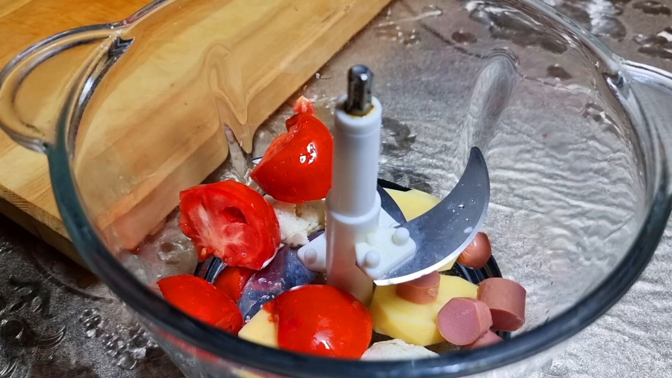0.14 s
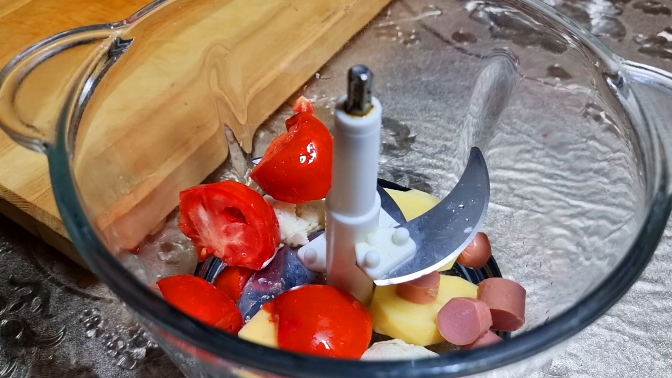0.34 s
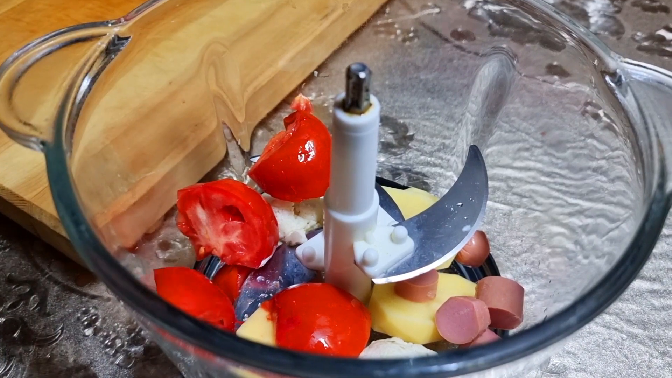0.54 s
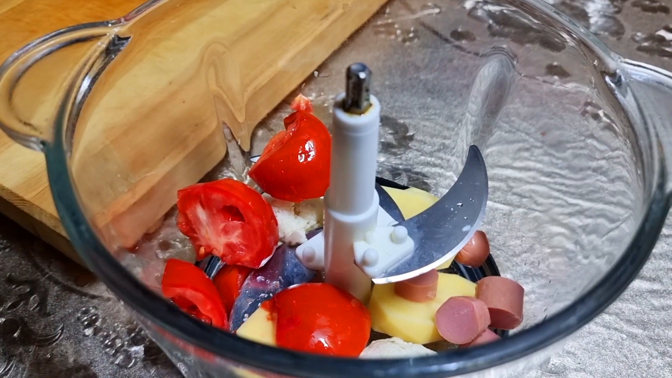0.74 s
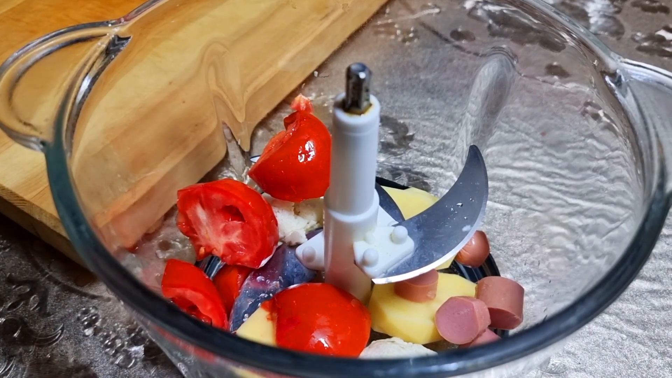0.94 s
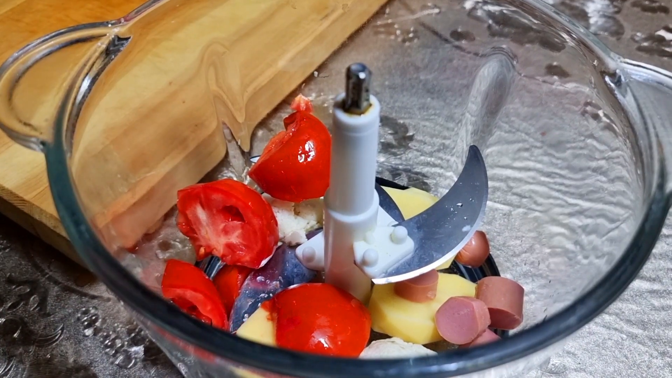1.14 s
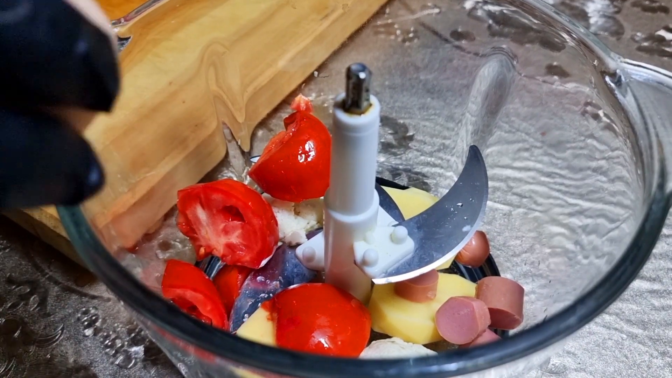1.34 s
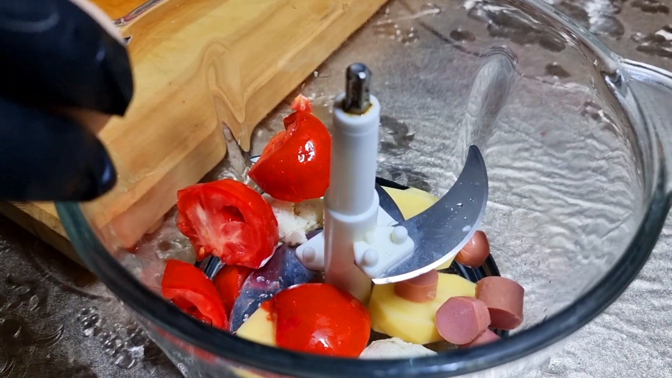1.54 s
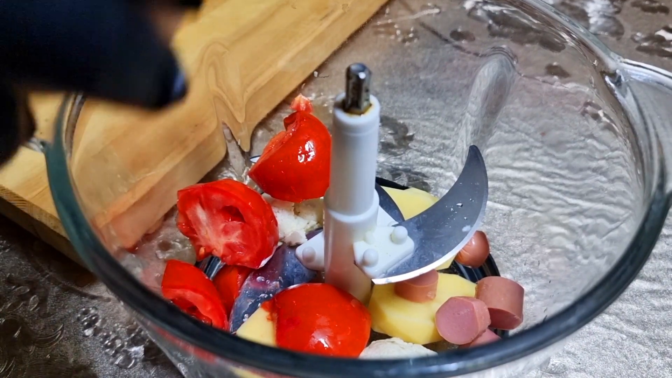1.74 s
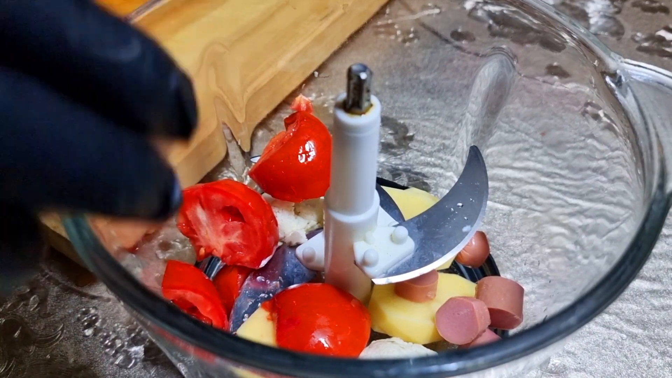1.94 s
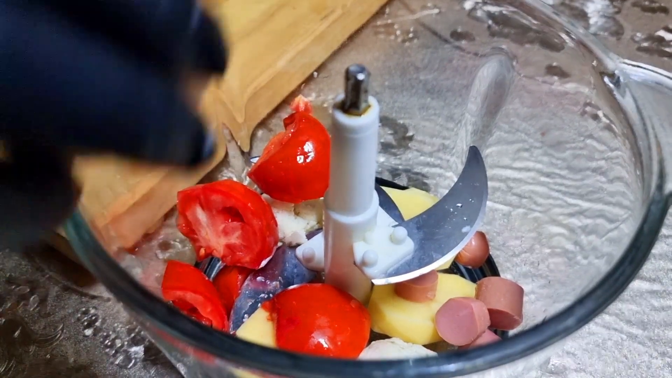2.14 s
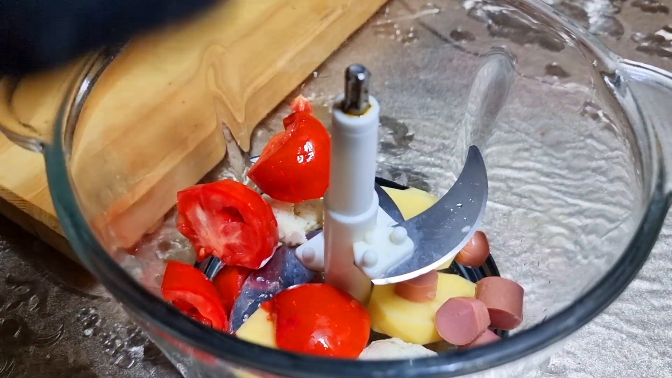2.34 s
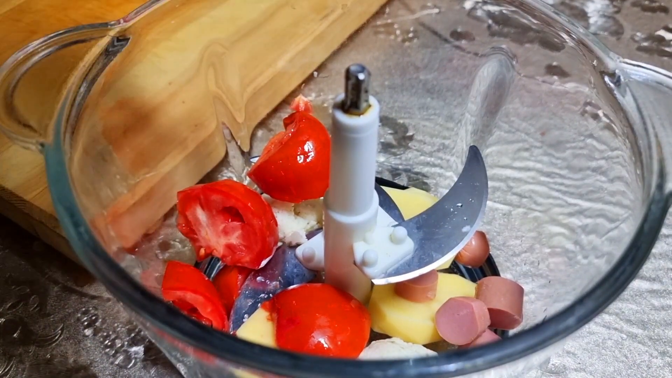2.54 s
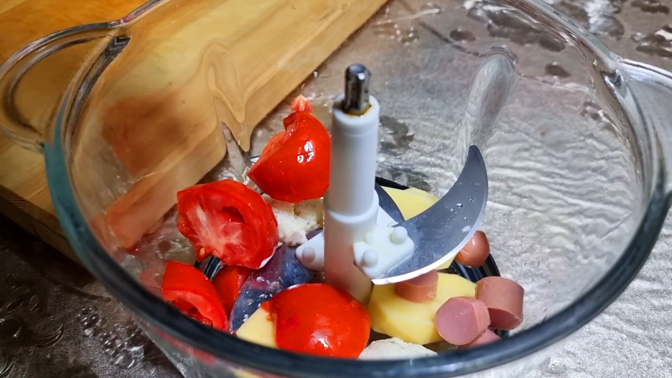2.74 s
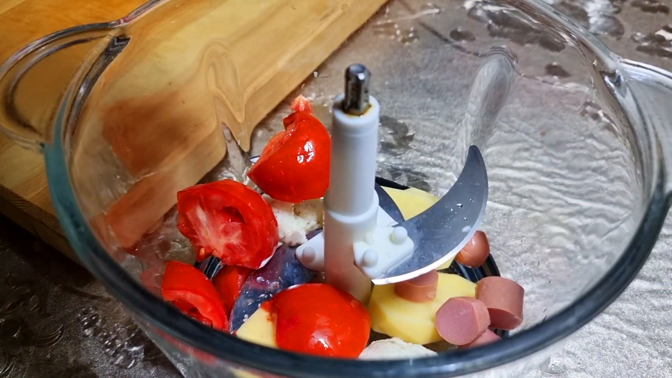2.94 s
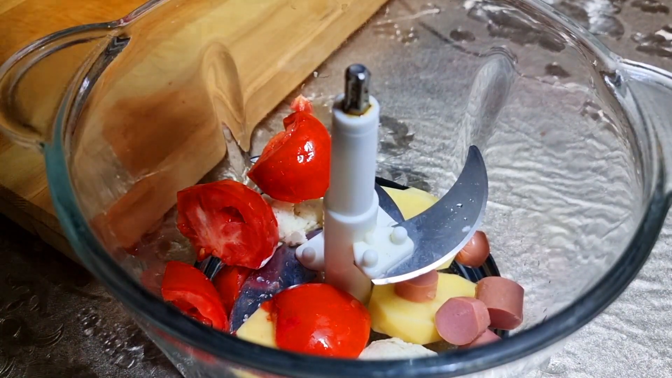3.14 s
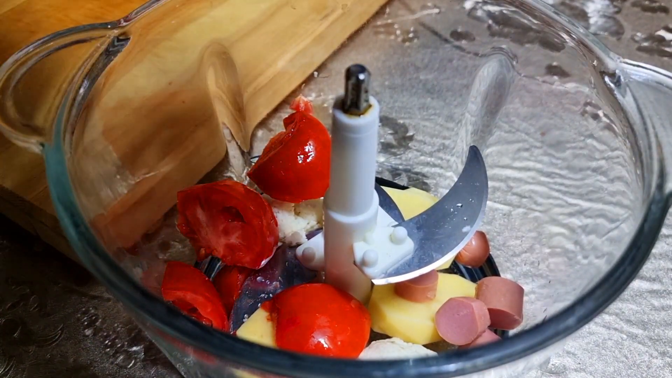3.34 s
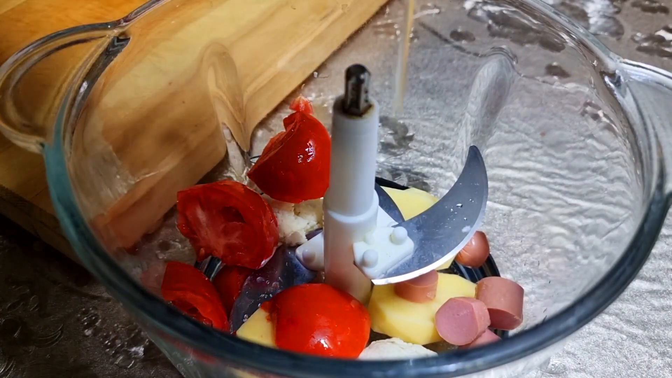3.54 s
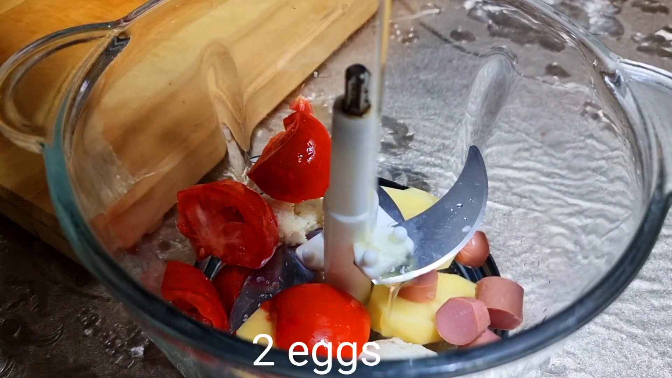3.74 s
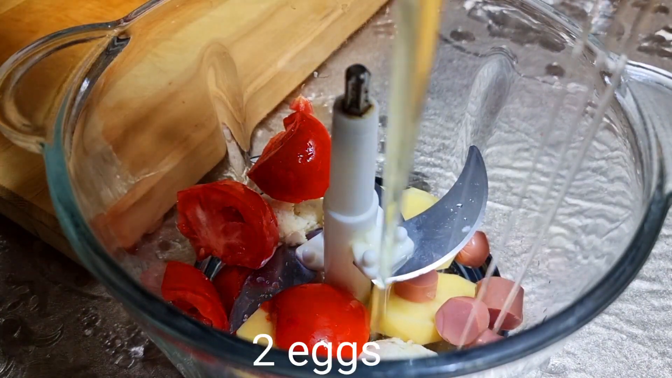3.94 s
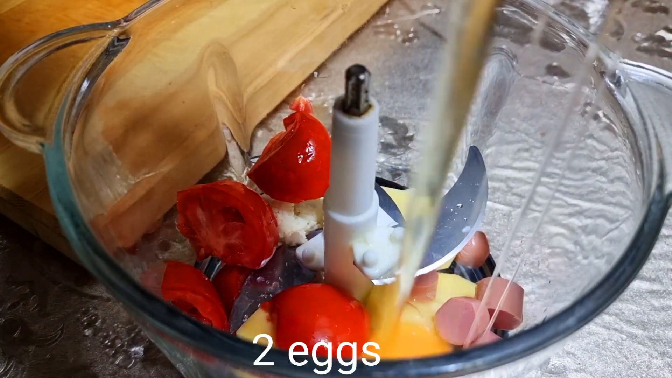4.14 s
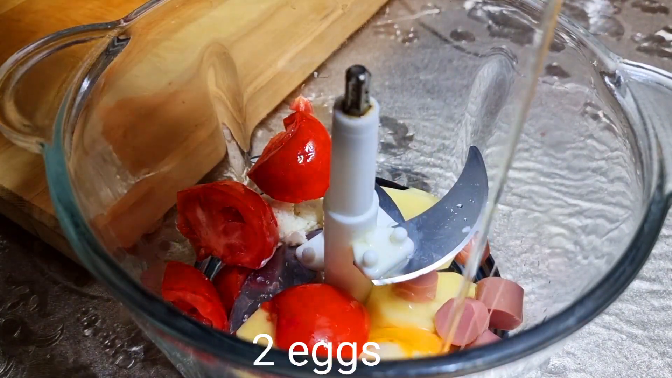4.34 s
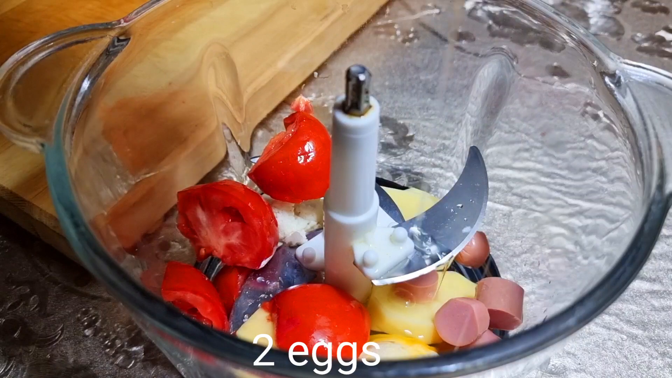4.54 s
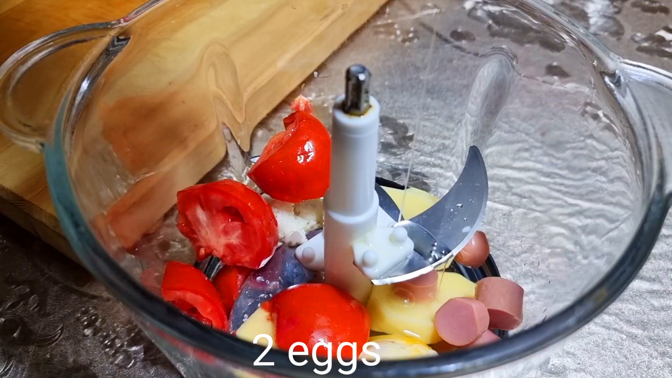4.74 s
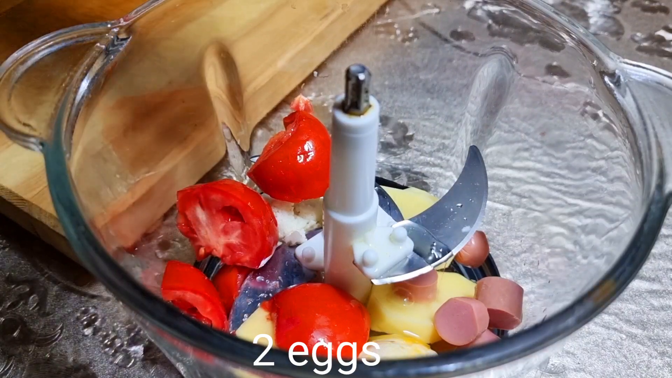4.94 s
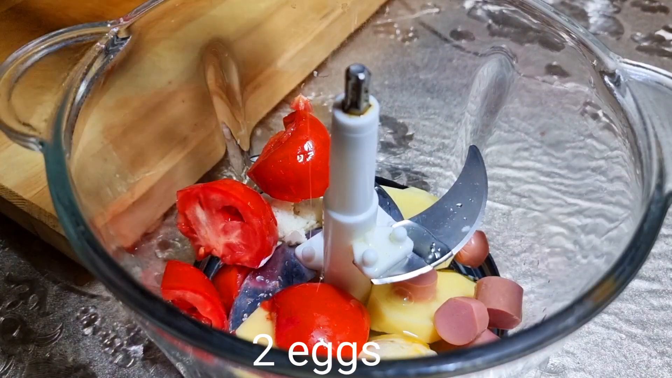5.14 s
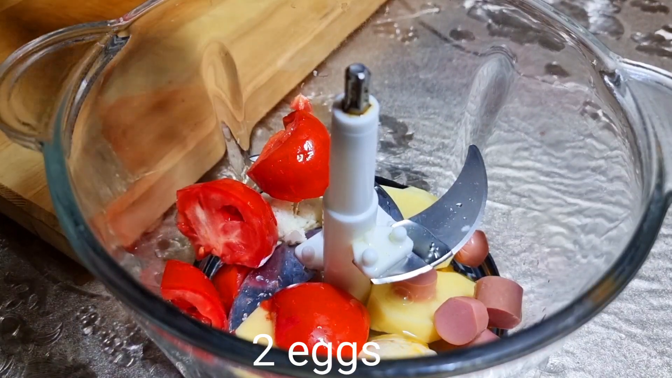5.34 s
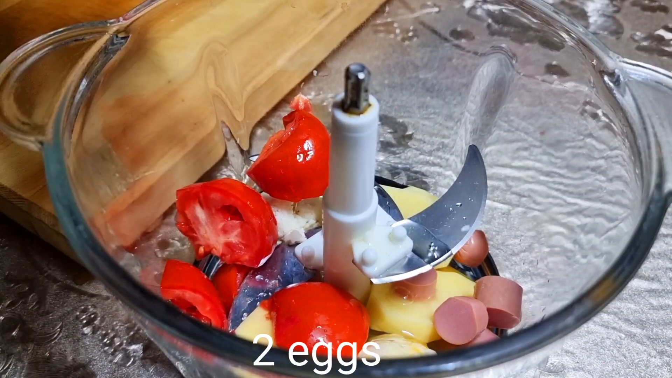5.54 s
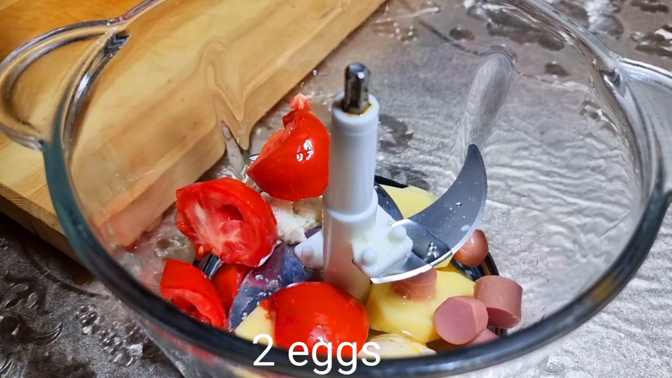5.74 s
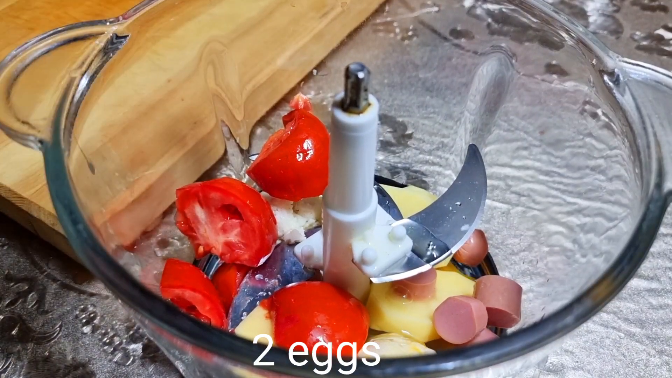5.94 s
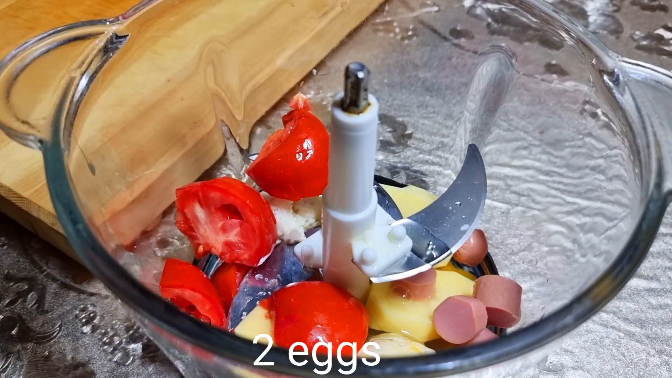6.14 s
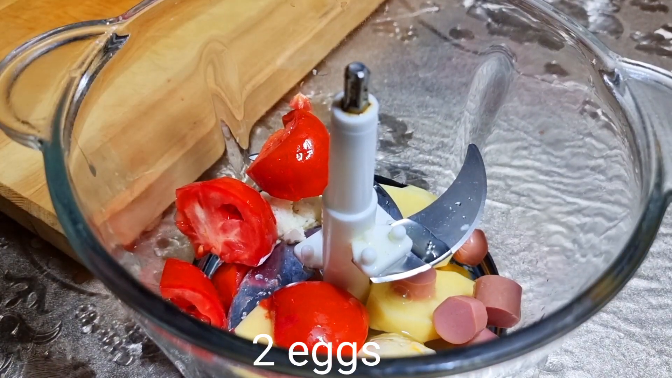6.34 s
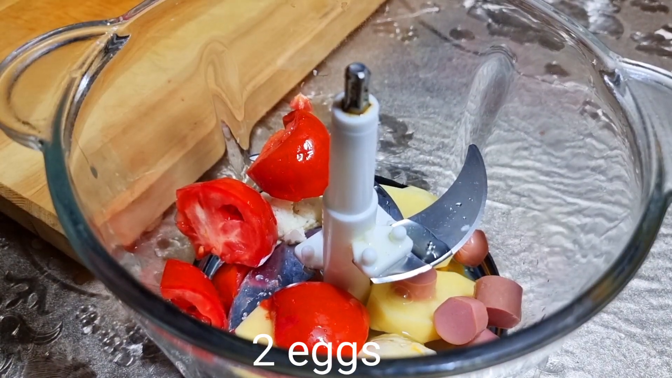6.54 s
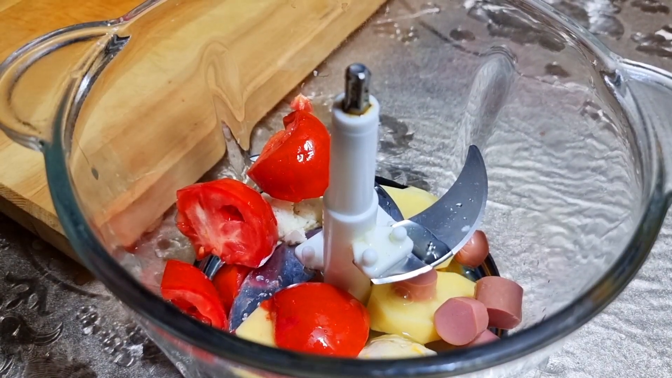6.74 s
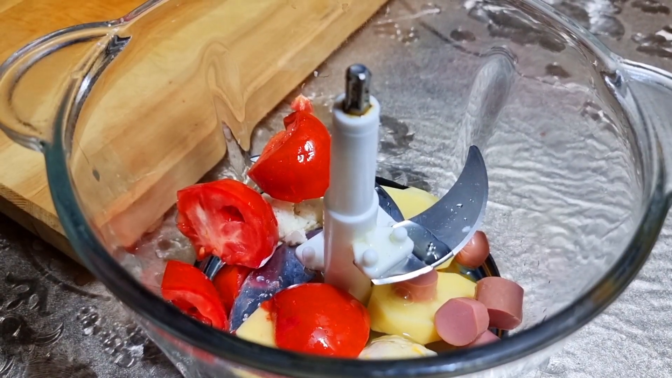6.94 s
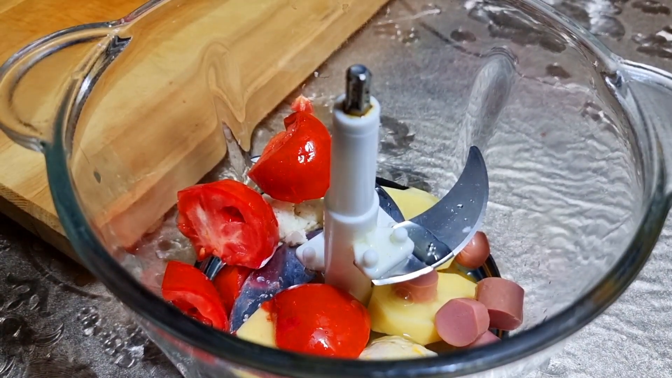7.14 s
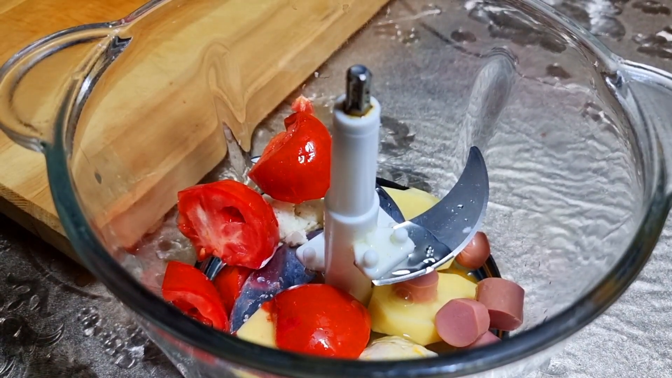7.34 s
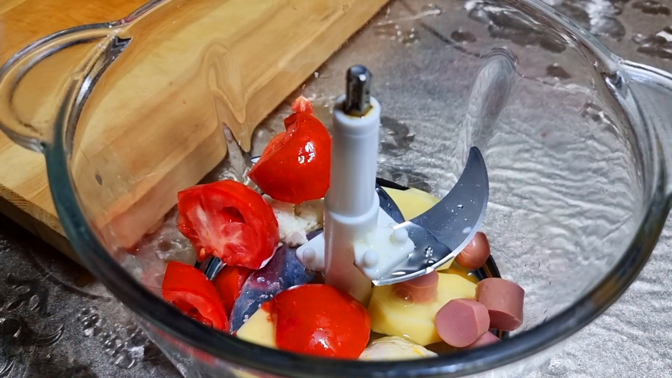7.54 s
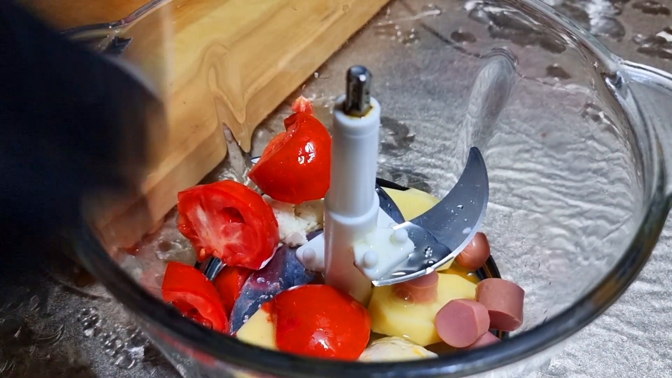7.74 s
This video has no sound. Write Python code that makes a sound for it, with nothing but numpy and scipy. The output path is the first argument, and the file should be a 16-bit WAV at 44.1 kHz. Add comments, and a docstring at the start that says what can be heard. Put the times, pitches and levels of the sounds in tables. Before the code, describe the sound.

Close stereo in a quiet kitchen with faint hiss and low room tone. After two near-silent seconds, an egg raps twice on a glass bowl, which rings brightly and thuds on the counter. The shell snaps in small dry cracks with a wet pop, the egg flops softly onto chopped vegetables, the empty shell crackles, soft thumps follow, and a dull knock sounds to the left.

```python
"""Quiet kitchen, close stereo: an egg is knocked twice on the rim of a glass chopper bowl.
The bowl rings as decaying wall modes and thuds on the counter as low modes and rumble.
The shell snaps (spiked noise); dry glove rubs and wet squelches are dense clicks, some ringing hollow.
The egg flops onto chopped vegetables with low thumps and pops, and the empty shell crackles.
A dull modal knock sounds to the left; noise hiss, with one faint rustle, and a low room tone run on."""
import sys
import numpy as np
from scipy import signal
from scipy.fft import rfft, irfft, next_fast_len
from scipy.io import wavfile
from scipy.ndimage import uniform_filter1d

SR = 44100
rng = np.random.default_rng(int(sys.argv[2]) if len(sys.argv) > 2 else 0)


def store_pcm(level_fs):
    """Save levels as 16-bit WAV."""
    pcm = np.round(np.clip(level_fs, -1, 1) * 32767).astype(np.int16)
    wavfile.write(sys.argv[1], SR, np.atleast_2d(pcm).T)


N = 347508


def from_db(db):
    """Decibels to amplitude gain."""
    return 10 ** (np.asarray(db) / 20)


def rms_one(x):
    """Scale to unit power."""
    return x / np.sqrt(np.mean(x ** 2) + 1e-20)


def seconds(length_s):
    """Time axis in seconds."""
    return np.arange(int(length_s * SR)) / SR


def decay(t, t60):
    """Exponential fall of 60 dB in t60, in the unit of t."""
    return np.exp(-np.log(1000) * t / t60)


def bell(t, centre_s, half_s):
    """Gaussian swell of height 1, down to 1/e at half_s from its centre."""
    return np.exp(-np.minimum(((t - centre_s) / half_s) ** 2, 50))


def panned(left_over_right_db):
    """Left and right gains for a level difference, at constant power."""
    return rms_one(from_db(np.array([[left_over_right_db], [-left_over_right_db]]) / 2))


def add(out, start_s, sound):
    """Mix a sound in at start_s."""
    i = int(round(start_s * SR))
    out[:, i:i + sound.shape[-1]] += sound[..., :N - i]


def at_hz(points, hz):
    """Interpolate a table along log frequency."""
    point_hz, value = np.transpose(points)
    return np.interp(np.log(np.maximum(hz, 1)), np.log(point_hz), value)


def band(x, edges_hz, kind, order=2):
    """Butterworth filter."""
    edges_hz = np.clip(edges_hz, 10, .47 * SR)
    return signal.sosfilt(signal.butter(order, edges_hz, kind, fs=SR, output="sos"), x)


def coloured(x, spectrum):
    """Minimum-phase filter with the given spectrum: nothing sounds early."""
    n = 2 * next_fast_len(x.shape[-1] // 2 + 1024)
    gain = from_db(at_hz(spectrum, np.arange(n // 2 + 1) * SR / n))
    cepstrum = irfft(np.log(gain))
    # fold onto positive time
    cepstrum[1:n // 2] *= 2
    cepstrum[n // 2 + 1:] = 0
    return irfft(rfft(x, n) * np.exp(rfft(cepstrum)))[..., :x.shape[-1]]


# left-right likeness of nearby sounds: pitch_hz, correlation [-1..1]
LIKENESS = [(100, 1), (400, 0.37), (900, 0.33), (1600, -0.73), (3500, -0.56), (8000, -0.53), (15000, 0.66)]


def stereo_noise(size):
    """White noise whose left-right correlation varies with frequency."""
    mid, side = rfft(rng.standard_normal((2, size)))
    alike = np.clip(at_hz(LIKENESS, np.arange(len(mid)) * SR / size), -1, 1)
    return irfft(np.sqrt(1 + alike) * mid + np.sqrt(1 - alike) * side * [[1], [-1]], size)


def burst(spectrum, t60_s, hold_s=0.0):
    """Contact: coloured noise that starts at unit power, holds and dies."""
    t = seconds(.6)
    noise = rms_one(coloured(stereo_noise(len(t)), spectrum))
    return noise * decay(np.maximum(t - hold_s, 0), t60_s)


# hiss colour, mid channel: pitch_hz, gain_db
HISS_MID = [(320, -36.5), (550, -6.5), (983, 0), (1110, -7.5), (1430, -3.5), (2450, -7.5), (2850, -3.5),
            (3610, -4), (4960, -2.5), (5460, -7.5), (6100, -7), (10200, -13), (11900, -36), (12900, -31),
            (15000, -33.5)]
# hiss colour, side channel: pitch_hz, gain_db
HISS_SIDE = [(180, -46.5), (300, -14.5), (597, -9.5), (637, -5.5), (1190, -5.5), (1520, -1.5), (2440, -10),
             (2780, -0.5), (3170, -7.5), (4770, -5), (5440, -11.5), (9030, -16.5), (10800, -24),
             (11900, -41.5), (15000, -34.5)]
# low tone of the room: pitch_hz, gain_db
ROOM_TONE = [(15, -44.5), (25, -14.5), (43, -11.5), (114, 2.5), (189, -16), (233, -8), (277, -2.5),
             (377, -5), (413, -7.5), (600, -13.5), (780, -37), (1320, -120)]


def hiss(level_db=-69, mid_db=0.0, side_db=3.0, room_db=-15, top_hz=10600, top_leak_db=-15,
         rustle_s=.92, rustle_half_s=0.31, rustle_db=2.0):
    """Wide noise, steeply cut at the top, over a low tone; a faint rustle of handling swells once in it."""
    mid = rms_one(coloured(rng.standard_normal(N), HISS_MID))
    side = rms_one(coloured(rng.standard_normal(N), HISS_SIDE))
    room = rms_one(coloured(rng.standard_normal(N), ROOM_TONE))
    noise = from_db(mid_db) * mid + from_db(side_db) * side * [[1], [-1]] + from_db(room_db) * room
    top_leak = from_db(top_leak_db) * band(noise, top_hz, "high", order=6)
    noise = band(noise, top_hz, "low", order=14) + top_leak
    # the rustle is made as a gain bump on the noise
    return noise * from_db(level_db + rustle_db * bell(np.arange(N) / SR, rustle_s, rustle_half_s))


# soft landings and nudges: start_s, level_db, pitch_hz
THUMPS = [(0.523, -62, 73), (0.609, -69, 63.6), (0.803, -60, 129), (1.127, -65.5, 84), (1.565, -68.5, 142),
          (1.954, -68, 129), (4.317, -45.5, 106), (4.33, -56, 220), (4.42, -69, 79.5), (4.877, -59, 350),
          (5.399, -58.5, 510), (5.474, -56, 280), (5.511, -59.5, 112), (5.68, -58.5, 91), (6.362, -51, 120),
          (6.434, -59, 126.5), (6.537, -42.5, 155.5)]


def thumps(rumble_db=-7, rise_cycles=1.2, decay_cycles=20, half_width_octaves=0.47):
    """Soft weights push slowly, so only a low tone and rumble answer; low ones swell and die slower."""
    out, t = np.zeros((2, N)), seconds(.4)
    width = 2 ** half_width_octaves
    for start_s, level_db, hz in THUMPS:
        cycles = hz * t
        rumble = rms_one(band(stereo_noise(len(t)), [hz / width, hz * width], "band"))
        rise = np.minimum(cycles / rise_cycles, 1)
        push = rise * decay(np.maximum(cycles - rise_cycles, 0), decay_cycles)
        answer = (np.sin(2 * np.pi * cycles) + from_db(rumble_db) * rumble) / np.sqrt(2)
        add(out, start_s, from_db(level_db) * push * answer)
    return out


# air pockets popping in wet food and shell: start_s, level_db, pitch_hz
POPS = [(0.614, -46, 4360), (3.7265, -28, 3610), (3.7485, -23.5, 3340), (3.7565, -31, 3450),
        (3.7671, -18, 3280), (3.813, -44, 2400), (4.328, -48.5, 1574), (4.341, -55.5, 818),
        (5.653, -36, 2920), (5.728, -43, 2708), (6.017, -42.5, 2370)]


def pops(glide=0.019, rise_s=0.00069, pan_db=5, left_lead_rad=0.83,
         pop_t60_cycles=33, after_t60_cycles=130, after_db=-13):
    """Air pockets open and ring for a set number of cycles, rising a little in pitch."""
    out, t = np.zeros((2, N)), seconds(.1)
    for start_s, level_db, hz in POPS:
        cycles = hz * t
        after_ring = decay(cycles, after_t60_cycles)
        pitch_hz = hz * (1 + glide * (1 - after_ring))
        phase = 2 * np.pi * np.cumsum(pitch_hz) / SR + np.array([[left_lead_rad], [0]])
        ring = decay(cycles, pop_t60_cycles) + from_db(after_db) * after_ring
        pop = np.sin(phase) * ring * (1 - np.exp(-t / rise_s))
        add(out, start_s, from_db(level_db) * pop * panned(pan_db))
    return out


# colour of the shell: pitch_hz, gain_db
SHELL = [(300, -12.5), (700, -9), (1000, 2), (1450, 4), (2050, 2), (3100, 1.5), (4300, 0.5), (5600, 1.5),
         (7000, -1), (9900, 2), (11300, -11), (15500, -17.5)]
# crackling movements, dry glove rubs and wet squelches: centre_s, half_s, fizz_db, hollow_db
MOVEMENTS = [(1.974, .028, -61, -86), (2.756, 0.022, -59.5, -78), (3.568, 0.0079, -42, -72),
             (3.808, 0.014, -53.5, -55), (4.113, .014, -64.5, -65.5), (4.347, 0.035, -61.5, -81),
             (5.485, 0.021, -57, -79), (5.664, 0.01, -60, -47.5), (5.732, .015, -55, -52),
             (5.806, .028, -68, -66.5), (6.023, 0.016, -60, -55.5)]


def crackling_movements(clicks_per_s=2200, grain_db=3.0, low_hz=2250, high_hz=3700, cavity_q=18,
                        slope_db=-6, fizz_top_hz=12500, pan_db=1.0, count=8,
                        tear_db=-27, tear_delay_s=0.0071, tear_half_s=0.031):
    """Dry glove rubs and wet squelches, as dense tiny clicks with some hollow ringing."""
    t = np.arange(N) / SR
    click_gain = from_db(grain_db * np.minimum(rng.exponential(1, N), 3))
    clicks = (rng.random(N) < clicks_per_s / SR) * click_gain
    grains = clicks * stereo_noise(N) + 1e-18
    fizz = rms_one(band(coloured(grains, SHELL), [1900, fizz_top_hz], "band"))
    # each click rings one of several small hollows
    dealt, hollow = rng.integers(0, count, N), 0
    for k, hz in enumerate(np.geomspace(low_hz, high_hz, count)):
        ring = signal.lfilter(*signal.iirpeak(hz, cavity_q, fs=SR), grains * (dealt == k) + 1e-18)
        hollow = hollow + from_db(slope_db * k / count) * ring
    gains = np.zeros((2, N))   # rows: fizz, hollow
    for centre_s, half_s, fizz_db, hollow_db in MOVEMENTS:
        gains += from_db([[fizz_db], [hollow_db]]) * bell(t, centre_s, half_s)
    # the membrane tears after every crack
    tear = bell(seconds(.5), tear_delay_s, tear_half_s)
    for start_s, level_db, *_ in CRACKS:
        add(gains[:1], start_s, from_db(level_db + tear_db) * tear)
    return (gains[0] * fizz + gains[1] * rms_one(hollow)) * panned(pan_db)


# egg on the rim: start_s, crunch_db, contact_s, crunch_edge_hz, rumble_db
KNOCKS = [(2.0668, -16.5, 0.014, 1523, -23.5), (2.2363, -15, 0.0055, 11180, -27.5)]
# bowl rocking on the counter: pitch_hz, t60_s, first_knock_db, second_knock_db
BASE = [(94, .1, -15.5, -15.5), (119, 0.25, -22.5, -19), (150.8, .22, -28.5, -27),
        (211, 0.25, -21.5, -28.5), (237, 0.21, -20, -37.5), (316, .26, -39, -41.5),
        (383, 0.071, -19.5, -32), (446.3, 0.14, -29.5, -39), (582, 0.036, -19.5, -43),
        (752, .05, -16.5, -38.5)]
# shell giving way against the rim: pitch_hz, gain_db
CRUNCH = [(60, -28), (250, -0.5), (600, -3), (1000, 0.5), (1400, -3), (2000, 2.5), (2800, -6), (4000, 5.5),
          (5000, -10.5), (7000, -4.5), (9600, 2.5), (11000, -8.5), (15000, -20)]
# dense rumble of the counter under the bowl: pitch_hz, gain_db
RUMBLE = [(30, -26), (60, -14), (95, 2.5), (150, -2.5), (220, -4), (290, -17), (400, -19), (550, -25),
          (1000, -30), (3000, -55)]


def rim_contacts(rock_s=0.0015, base_pan_db=0.0, crunch_pan_db=-2.5, crunch_t60_s=0.031,
                 tail_db=-15, tail_t60_s=.1, leak_db=-24, rumble_t60_s=.26):
    """The shell crunches at each knock while the heavy bowl starts to rock on its base."""
    out, t = np.zeros((2, N)), seconds(1)
    swing = 1 - np.exp(-t / rock_s)
    for k, (start_s, crunch_db, contact_s, edge_hz, rumble_db) in enumerate(KNOCKS):
        tail = from_db(tail_db) * band(burst(CRUNCH, tail_t60_s), 8000, "low")
        crunch = burst(CRUNCH, crunch_t60_s, contact_s) + tail
        crunch = band(crunch, edge_hz, "low") + from_db(leak_db) * crunch
        add(out, start_s, from_db(crunch_db) * crunch * panned(crunch_pan_db))
        rock = np.zeros(len(t))
        for i, (hz, t60_s, *levels_db) in enumerate(BASE):
            mode = np.sin(2 * np.pi * hz * t) * decay(t, t60_s)
            rock += (-1) ** i * from_db(levels_db[k]) * mode   # alternating polarity
        add(out, start_s, band(rock * swing, 60, "high") * panned(base_pan_db))
        rumble = from_db(rumble_db) * burst(RUMBLE, rumble_t60_s)
        add(out, start_s, rumble * swing[:rumble.shape[1]])
    return out


# wall of the bowl: pitch_hz, t60_s, first_knock_db, second_knock_db (both before trims),
# left_over_right_db, left_lead_rad
GLASS = [(829.3, 0.9, -7, -22, -4, -2.8), (848.2, 1.0, -19, -27, 2, 1.4), (2028, 0.43, -36, -26, 5, -2.0),
         (2194, 0.47, -43, -31, -5, -0.1), (2906, 0.08, -41, -37, 1, 0.8),
         (3645, 0.28, -23, -25, -17, -1.7), (4093, 0.23, -16, -15, -18, -2.1),
         (5728, 0.13, -35, -41, -10, 0.2), (6185, 0.12, -35, -29, -11, -0.5),
         (6547, 0.06, -24, -27, -1, -1.8), (7092, 0.1, -32, -21, 3, 1.2), (7320, 0.12, -39, -36, 2, 0.8),
         (7581, 0.11, -30, -29, -5, -0.6), (7980, 0.07, -34, -23, 5, 1.2), (8424, 0.13, -36, -28, 4, -2.5),
         (9249, 0.09, -32, -26, 1, 1.9), (9395, 0.1, -49, -27, 6, -1.6), (10279, 0.06, -42, -43, 3, 0.4),
         (11364, 0.06, -42, -33, -11, -2.4), (11938, 0.08, -50, -42, 3, -1.5),
         (12694, 0.05, -40, -42, 7, -0.8), (13023, 0.05, -42, -36, -2, 0.3),
         (13317, 0.05, -41, -30, 5, 2.7), (13968, 0.06, -43, -37, 2, 1.1), (14674, 0.06, -47, -39, -6, 0.2)]


def glass(ring_trim_db=0.0, treble_trim_db=0.74, build_cycles=5.6, damp_t60_s=.03):
    """Wall modes ring, close ones beating; the second knock stops the first ring and starts its own."""
    out, t = np.zeros((2, N)), seconds(2)
    first_s, second_s = KNOCKS[0][0], KNOCKS[1][0]
    stopped = decay(np.maximum(t - (second_s - first_s), 0), damp_t60_s)
    for hz, t60_s, first_db, second_db, pan_db, left_lead_rad in GLASS:
        gain = from_db(ring_trim_db + treble_trim_db * (hz > 1000))
        phase = 2 * np.pi * hz * t + np.array([[left_lead_rad], [0]])
        swell = 1 - np.exp(-t * hz / build_cycles)   # the soft egg lets the low modes swell
        tone = gain * np.sin(phase) * panned(pan_db) * decay(t, t60_s) * swell
        add(out, first_s, from_db(first_db) * tone * stopped)
        add(out, second_s, from_db(second_db) * tone)
    return out


# cracks in the shell: start_s, level_db (2-6 kHz), brightness_db (treble up, bass down), run_s
CRACKS = [(3.1267, -35.5, 2.5, 0.014), (3.2105, -58.5, 12, .003), (3.2631, -41, -6, 0.0086),
          (3.2837, -41.5, -1.5, .003), (3.3363, -29.5, -8, 0.0071), (3.348, -41, -12.5, 0.012),
          (3.376, -53.5, -9, .003), (3.5604, -40.5, -11.5, 0.015), (3.5766, -42.5, -8, .003),
          (3.7258, -26, 4, 0.0045), (3.747, -45, 5, .003), (3.7566, -43.5, 5, 0.008),
          (3.766, -36.5, 3, .003), (4.5225, -60.5, -23.5, .003), (4.8645, -67, 22, .003),
          (5.3994, -50.5, -16, .003), (5.42, -51.5, 3, 0.004), (5.4709, -42.5, -4, 0.0053),
          (5.6513, -50, 9.5, .01), (5.7905, -57, 3, .003), (5.8207, -53.5, 1, .003),
          (5.9636, -51.5, 14, .003), (5.987, -48.5, -1, .003), (5.9959, -43, 6.5, .003),
          (6.042, -50, 9, 0.0057), (6.0744, -53.5, 14, .003), (6.206, -50.5, -1.5, .003)]


def snaps(snap_db=0.0, spike_db=12, crack_t60_s=0.013, tail_db=-19, tail_t60_s=0.09, grain_db=1.5,
          count=5, gap_s=.0058, gap_jitter=.12, run_loss_db=12.5, bass_db=-15.5, treble_db=-7,
          pan_db=3, pan_spread_db=1, warning_s=.011, warning_db=-21, warning_max_db=-55):
    """A faint tick before the shell gives, then ever weaker snaps: sharp spikes with ragged rings."""
    out, t = np.zeros((2, N)), seconds(.15)
    edges_hz = [(400, 2100), (2000, 6000), (6000, 16000)]
    attack = (t >= warning_s) & (t < warning_s + .005)   # level reference
    piece_hz = np.geomspace(300, 16000, 60)
    ring = decay(t, crack_t60_s) + from_db(tail_db) * decay(t, tail_t60_s)
    for start_s, level_db, bright_db, run_s in CRACKS:
        gaps_s = gap_s * np.exp(gap_jitter * rng.standard_normal(count))
        delays_s = np.r_[0, np.cumsum(gaps_s)]
        spikes = from_db(min(warning_db, warning_max_db - level_db)) * (t == 0)
        snap_at = np.searchsorted(t[:-1], warning_s + delays_s)
        spikes[snap_at] = from_db(-run_loss_db * (delays_s / run_s) ** 2)
        power = signal.fftconvolve(spikes ** 2, ring ** 2)[:len(t)]
        envelope = np.sqrt(np.abs(power))
        grain = rms_one(uniform_filter1d(rng.standard_normal(len(t)), size=16))
        ragged = from_db(grain_db * grain)
        fracture = stereo_noise(len(t)) * ragged * envelope + from_db(spike_db) * spikes
        # every piece of shell has resonances of its own
        colour_db = at_hz(SHELL, piece_hz) + rng.normal(0, 3.5, len(piece_hz))
        fracture = coloured(fracture, np.c_[piece_hz, colour_db])
        place = panned(pan_db + pan_spread_db * rng.standard_normal())
        bands_db = (bass_db - bright_db, 0, treble_db + bright_db)
        for band_db, edge_hz in zip(bands_db, edges_hz):
            part = band(fracture, edge_hz, "band", order=3)
            part = part / np.std(part[:, attack])
            add(out, start_s - warning_s, from_db(level_db + band_db + snap_db) * part * place)
    return out


# dull knock on the counter: start_s, level_db
COUNTER_HITS = [(6.7149, -5), (6.72, -14.5)]
# counter modes: pitch_hz, level_db, t60_s
COUNTER = [(159, -26.5, 0.144), (206, -30, 0.125), (334, -47, 0.25), (383, -24.5, 0.092), (405, -33, 0.12),
           (529.4, -54, 0.073), (608, -22.5, 0.074), (732, -25.5, 0.075), (758, -21.5, 0.054),
           (790, -21, 0.072), (982, -25.5, 0.061), (1140, -30, 0.04), (1360, -24, 0.05), (1480, -31, .06),
           (1775, -27.5, 0.042), (1970, -21, 0.016), (2480, -65, 0.037)]
# counter contact: pitch_hz, gain_db
CONTACT = [(150, -5), (400, 1.5), (800, -1), (1400, -3.5), (2300, -20), (3000, -13), (5000, -27),
           (10000, -33), (15000, -59)]


def counter_knock(lag_s=0.00039, soft_hz=2300, contact_db=-24, contact_t60_s=0.031,
                  tail_db=-31, tail_t60_s=0.1, lowest_hz=130):
    """A dull blow and its bounce on the left; the modes reach the right ear later."""
    out, t = np.zeros((2, N)), seconds(.4)
    arrival = np.maximum(t - np.array([[0], [lag_s]]), 0)
    body = np.zeros((2, len(t)))
    for hz, level_db, t60_s in COUNTER:
        body += from_db(level_db) * np.sin(2 * np.pi * hz * arrival) * decay(arrival, t60_s)
    for start_s, level_db in COUNTER_HITS:
        add(out, start_s, from_db(level_db) * band(body, soft_hz, "low"))
    # countless weaker modes blur into a tail that is darker than the contact
    tail = from_db(tail_db) * band(burst(CONTACT, tail_t60_s), soft_hz / 2, "low", order=1)
    contact = from_db(contact_db) * burst(CONTACT, contact_t60_s)
    add(out, COUNTER_HITS[0][0], contact + tail)
    return band(out, lowest_hz, "high", order=4)


def kitchen(x, wet_db=-23, t60_s=0.17, dull_hz=5000):
    """Faint, short, diffuse reflections: convolution with decaying noise."""
    t = seconds(.5)
    response = band(rng.standard_normal((2, len(t))), [300, dull_hz], "band", order=1)
    response = response * decay(t, t60_s) * (t > .004)
    response = response / np.linalg.norm(response[0])
    return from_db(wet_db) * signal.fftconvolve(x, response, axes=1)[:, :N]


def scene():
    """The bowl rings right at the microphone; the handling also stirs the room."""
    handling = thumps() + pops() + crackling_movements() + rim_contacts() + snaps() + counter_knock()
    return hiss() + glass() + handling + kitchen(handling)


def record(dry, ceiling=4.5, cutoff_hz=15800):
    """Round the highest peaks and cut the top steeply."""
    return band(ceiling * np.tanh(dry / ceiling), cutoff_hz, "low", order=20)


dry = scene()
out = record(dry)
store_pcm(out)
```